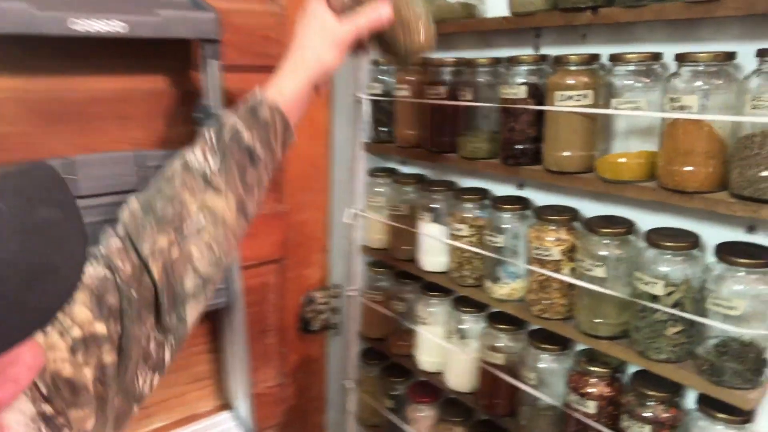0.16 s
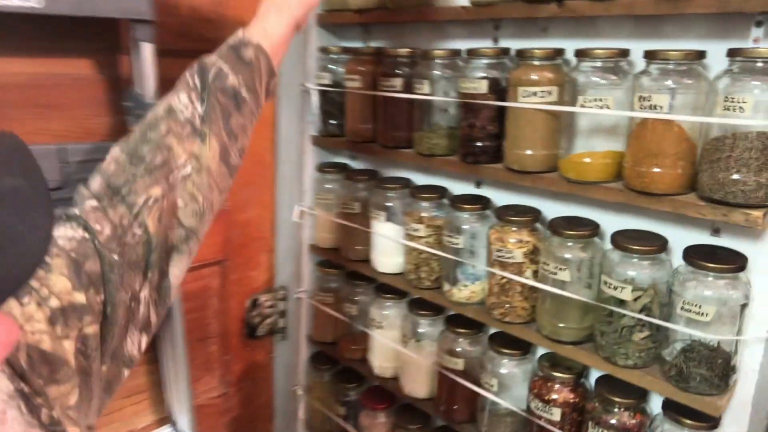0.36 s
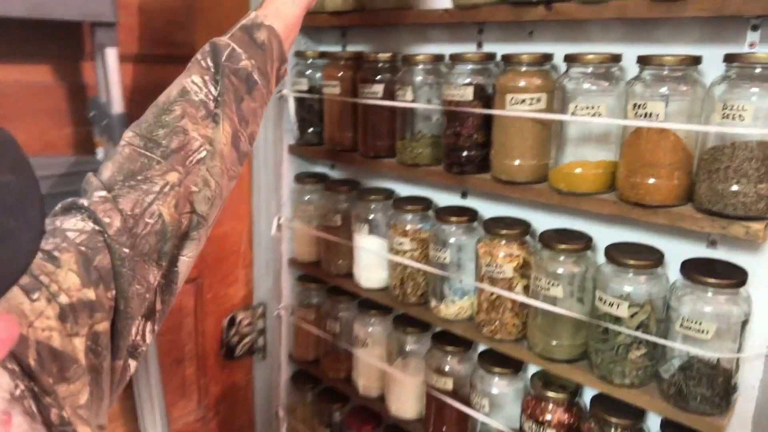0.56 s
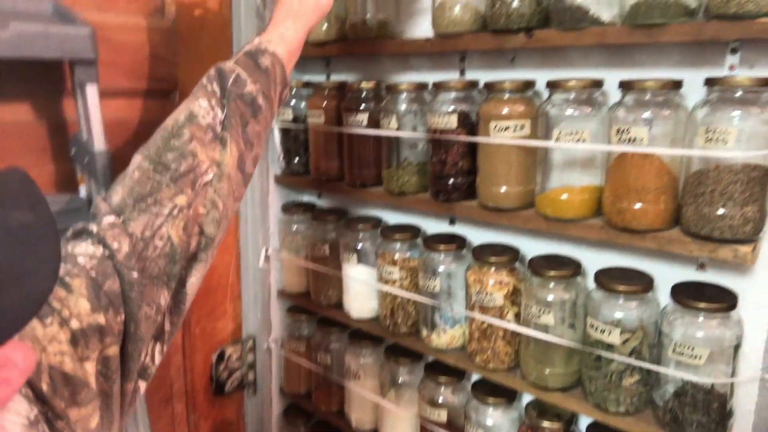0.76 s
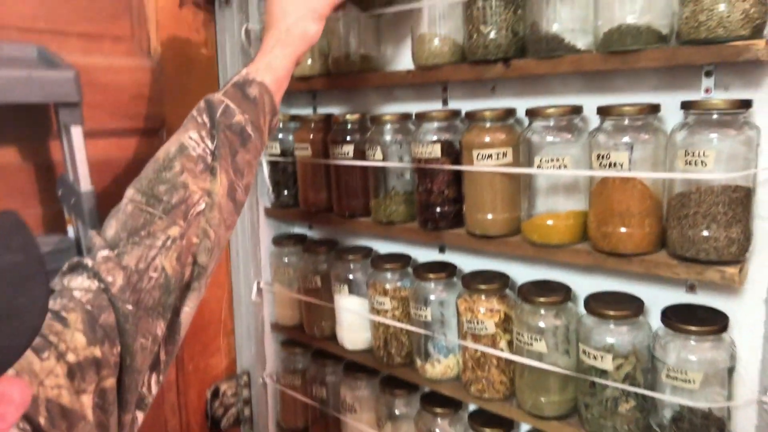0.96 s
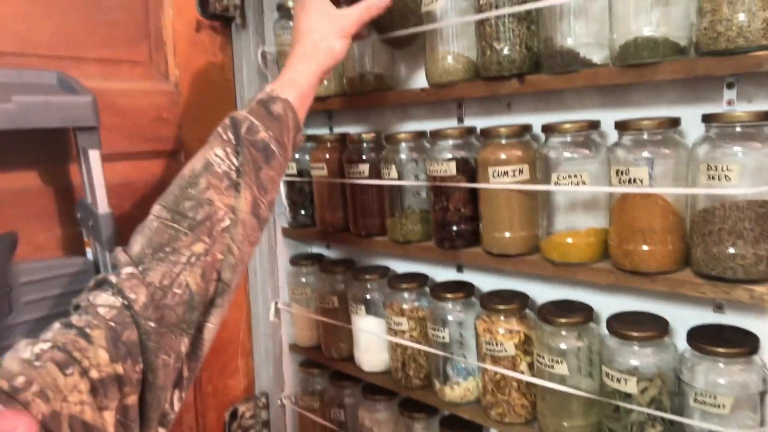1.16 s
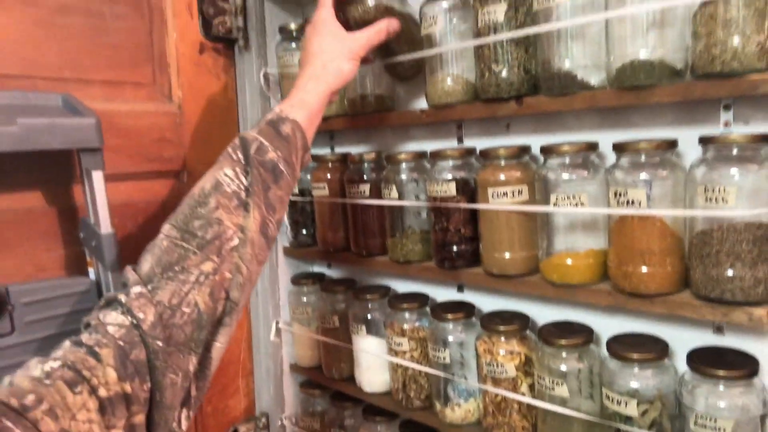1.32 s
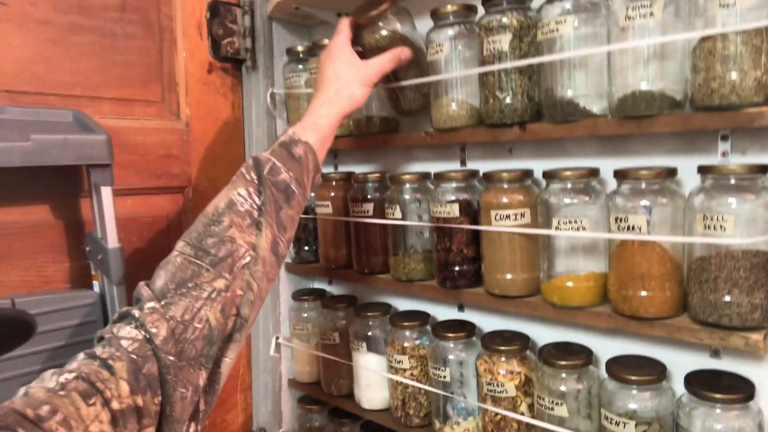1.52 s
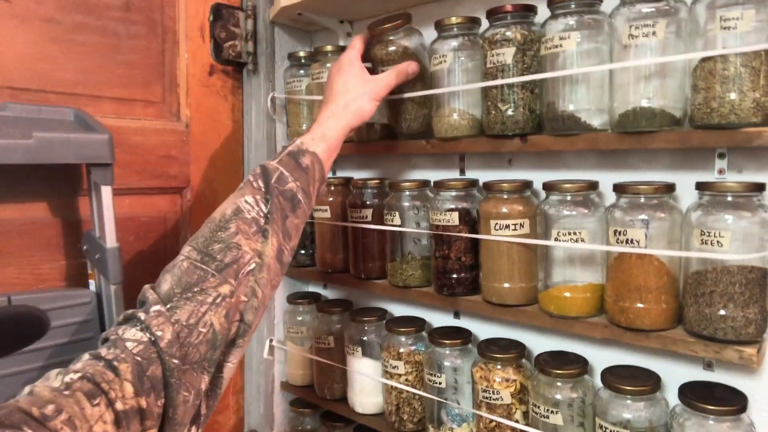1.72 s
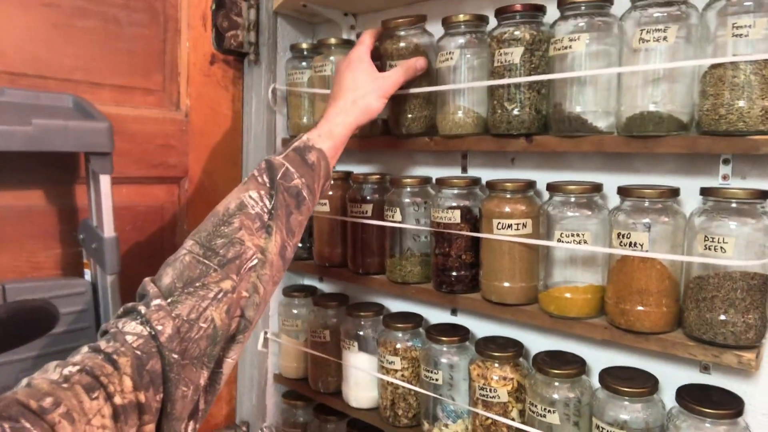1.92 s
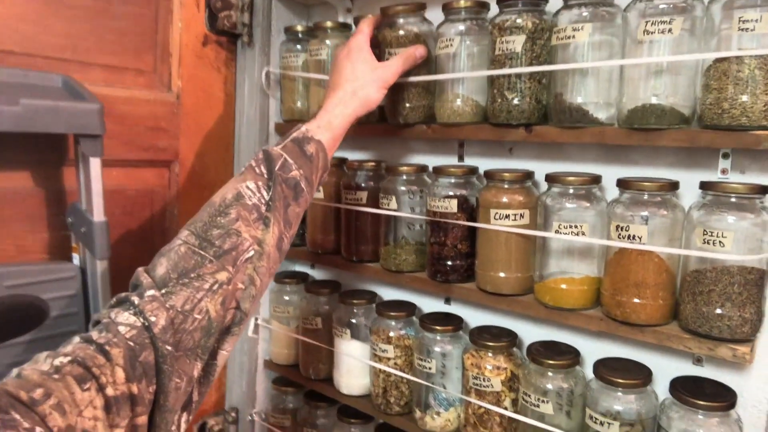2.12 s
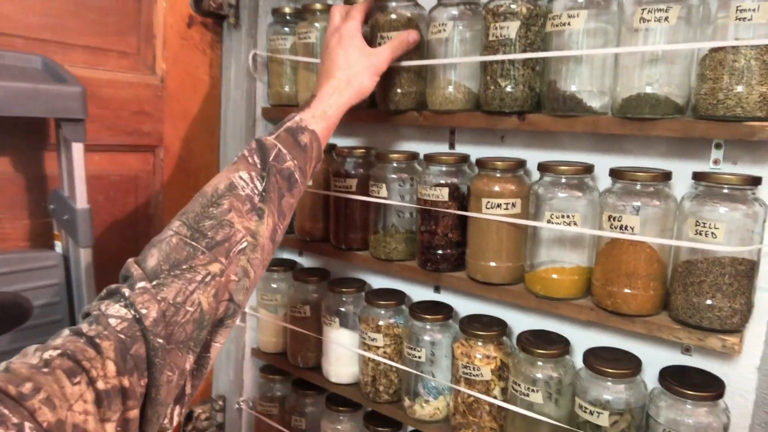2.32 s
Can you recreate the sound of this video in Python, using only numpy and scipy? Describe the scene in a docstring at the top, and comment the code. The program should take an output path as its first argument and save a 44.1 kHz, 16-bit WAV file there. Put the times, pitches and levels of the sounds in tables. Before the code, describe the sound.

Glass jar clinking among jars on a wooden shelf in a small room, heard close. An earlier bang dies away at 0-0.4 s with sleeve rustle, a faint airy swish and dull cord blips. Tiny clinks come near 0.6 s, cord rubs at 0.8-1.1, light clinks at 1.05-1.15 and 1.4, sharp ones at 1.7 and, loudest, 2.0, then small taps to 2.35. Faint hiss and rumble.

```python
"""On a wooden pantry shelf in a small room, a hand-held glass jar clinks against its neighbours.
Each contact sums decaying sine modes of the glass with a short noise crack, and the room answers.
The elastic cord across the shelf rubs in dull blips, each a few low sines under a smooth envelope.
Shaped noise gives the dying earlier bang, the sleeve's rustle and swish, the handling rumble and the hiss."""
import sys
import numpy as np
from scipy import signal
from scipy.fft import rfft, irfft, next_fast_len
from scipy.io import wavfile
from scipy.ndimage import uniform_filter1d

SR = 44100
rng = np.random.default_rng(int(sys.argv[2]) if len(sys.argv) > 2 else 0)


def log_audio(samples):
    """Write samples as a 16-bit WAV file to the path given in sys.argv[1]."""
    # one column per channel
    frames = np.atleast_2d(samples).T
    # limit to full scale, then quantise
    limited = np.clip(frames, -1, 1)
    pcm = np.round(limited * 32767).astype(np.int16)
    wavfile.write(sys.argv[1], SR, pcm)


N = 105002


def amp(db):
    """Logarithmic level: 20 dB is a factor of ten in amplitude."""
    return 10 ** (np.asarray(db) / 20)


def unit(x):
    """Normalization by root mean square: x is scaled to rms 1."""
    return x / np.sqrt(np.mean(x ** 2) + 1e-20)


def along(points, hz):
    """Log-frequency interpolation of (f/Hz, value) points."""
    f, v = np.transpose(points)
    return np.interp(np.log(hz + 1), np.log(f + 1), v)


def curve(rows):
    """Linear interpolation in time of (t/s, value) rows, one value per sample."""
    return np.interp(np.arange(N) / SR, *np.transpose(rows))


def filtered(x, response):
    """Linear filtering: the spectrum of x times a response of frequency."""
    padded = next_fast_len(N + 8192)
    spectrum = rfft(x, padded) * response(np.fft.rfftfreq(padded, 1 / SR))
    return irfft(spectrum, padded)[..., :N]


def rush(spectrum, patchy_db):
    """Random noise of rms 1: time-frequency patches of random gain, then a spectral envelope."""
    z = signal.stft(rng.standard_normal(N), nperseg=512)[2]
    field = uniform_filter1d(rng.standard_normal(z.shape), size=5, axis=0)  # smooth over frequency
    field = uniform_filter1d(field, size=6, axis=1)  # smooth over time
    x = signal.istft(z * amp(patchy_db * unit(field)), nperseg=512)[1][:N]
    return unit(filtered(x, lambda hz: amp(along(spectrum, hz))))


def in_room(x, wet_db):
    """Diffuse reverberation: convolution with a direct pulse and a newly drawn decaying noise tail."""
    # reverberation time of the room: f/Hz, t60/s
    room_t60 = [(200, 0.44), (1000, 0.31), (3000, 0.31), (6000, 0.25), (12000, 0.24)]
    wall_s = 0.006  # delay of the tail behind the direct sound
    hz, t, z = signal.stft(rng.standard_normal(SR // 2), SR, nperseg=256)
    decay = amp(-60 * t / along(room_t60, hz)[:, None])
    tail = signal.istft(z * decay, SR, nperseg=256)[1]
    tail = amp(wet_db) * tail / np.linalg.norm(tail)
    response = np.pad(tail, (round(wall_s * SR), 0))
    response[0] = 1  # direct sound
    return signal.fftconvolve(x, response)


def add(track, x, s):
    """Superposition: x is added to the track from s seconds on."""
    part = track[round(s * SR):][:len(x)]
    part += x[:len(part)]


def clinks():
    """Modal superposition: each contact rings the glass modes in its own proportions, with a crack."""
    # contacts between jars: t/s, crack level/dB, attack/ms, multiplier of the modes' t60,
    # then the mode level/dB at each region
    contacts = [(0.566, -55, 1.04, 1.4, -67, -60, -89, -89, -80, -77, -77, -85, -82, -74, -79, -84, -82, -78, -82, -93, -81, -76),
                (0.647, -42, 1.04, 1.34, -53.5, -71, -50, -54, -69, -69, -62, -74, -75, -72, -74, -87, -88, -86, -86, -91, -88, -84),
                (0.657, -50, 1.03, 1.03, -63, -72, -63, -55, -57, -62, -60, -67, -75, -78, -75, -86, -87, -85, -87, -91, -90, -80),
                (1.041, -30, 1.05, 1.05, -48, -35, -52, -48, -47.5, -57, -54, -49.5, -47.5, -48, -57, -68, -68, -66, -64, -68, -71, -64),
                (1.129, -29.5, 0.88, 1.45, -68.5, -45, -49.5, -57, -55.5, -57, -62, -58, -56, -53, -83, -78, -73, -77, -78, -80, -81, -78),
                (1.155, -35, 1.22, 1.1, -69, -45, -45, -47, -49, -58, -64, -53, -50.5, -49, -64, -76, -72, -73, -76, -78, -77, -74),
                (1.266, -57, 1.1, 1.3, -65, -83, -75, -79, -87, -73, -79, -73, -73, -62, -79, -83, -82, -83, -80, -85, -75, -76),
                (1.424, -24.5, 1.24, 0.91, -63, -39.5, -41.5, -58, -39, -36, -48, -46, -43, -33, -48, -54, -55, -45, -52, -62, -53, -59),
                (1.428, -38, 1.116, 1.16, -52, -40.5, -42.5, -45, -47, -46, -50, -38.5, -43, -38, -62, -71, -61, -59, -68, -67, -63, -74),
                (1.706, -19, 0.94, 0.82, -41, -34, -29.5, -50, -28.5, -26, -58, -30.5, -33.5, -18.5, -38.5, -50, -45, -48, -42.5, -47, -53, -47.5),
                (2.004, -16, 1.22, 1.07, -51, -28, -53, -28, -28.5, -38, -44, -23.5, -32.5, -25.5, -36.5, -50, -44, -44, -45, -48, -52, -49),
                (2.013, -17, 1.1, 1.02, -55.5, -31, -34, -33.5, -48, -24, -43, -36, -57, -40.5, -62, -55, -51, -50, -63, -48, -59, -69),
                (2.092, -39, 1.1, 0.87, -56, -41.5, -37, -36, -52, -57, -54, -36.5, -51, -39, -53, -67, -60, -55, -60, -79, -74, -67),
                (2.277, -45, 1.2, 1.5, -71, -75, -69, -76, -68, -39.5, -62, -69, -74, -72, -84, -85, -86, -82, -85, -91, -89, -80),
                (2.299, -62, 0.71, 0.54, -67, -78, -78, -80, -76, -72, -76, -79, -77.5, -82, -69, -88, -90, -82, -94, -89, -89, -64),
                (2.334, -38, 1, 0.94, -56.5, -63, -72, -62, -66, -64, -77, -70, -72, -80, -79, -78, -79, -83, -79, -90, -89, -86),
                (2.34, -47, 1.36, 0.86, -84, -51, -66, -69, -51, -61, -67, -45.5, -56.5, -60, -74, -79, -72, -74, -82, -89, -89, -85),
                (2.346, -39, 1.43, 0.88, -70, -36.5, -59, -57, -51, -65, -66, -49.5, -78, -74, -77, -82, -79, -80, -88, -90, -89, -85)]
    # centres of those spectral regions: f/Hz
    regions_hz = [420, 900, 1150, 1410, 1600, 1950, 2600, 3080, 3350, 4050, 5200, 6640, 7000, 7350, 8650,
                  10260, 10880, 12000]
    # modes of the jars on their shelf: f/Hz, level/dB relative to the region level,
    # t60/s before the contact's multiplier
    glass = [(415.5, 1, 0.091), (565, 0, 0.066), (775, 0, 0.025), (868, 0.5, 0.036), (942, 4, 0.036),
             (1081, 7.5, 0.02), (1159, 3, 0.036), (1259, 2, .03), (1429, 1, 0.054), (1482, -4, 0.052),
             (1589, 8, 0.021), (1650, 3, 0.018), (1883, 0, 0.021), (2500, -3, 0.028), (2795, -5, 0.088),
             (3101, -1, 0.062), (3147, -1, 0.055), (3335, 3, 0.042), (3418, 2.5, 0.02), (3860, -12, 0.062),
             (3993, -2.5, 0.047), (4047, -1.5, 0.068), (4430, -15.5, 0.052), (5350, -2.5, 0.037),
             (6740, 7.3, 0.035), (6960, 3, 0.07), (7340, 4, .06), (7150, -5, 0.04), (8620, -6, .05),
             (8780, -5, 0.045), (10250, 0.5, 0.031), (10930, 0.5, .05), (11940, 0.5, 0.044),
             (12600, -7, .05)]
    lead_attacks = 0.7  # start ahead of the listed time, in attack times
    scatter_db, crack_t60_s, room_db = 3, 0.041, -8

    out, t = np.zeros(N), np.arange(SR // 3) / SR
    hz, mode_db, t60_s = np.transpose(glass)[..., None]
    grid = np.fft.rfftfreq(len(t), 1 / SR)
    low_cut = grid ** 4 / (grid ** 4 + 300 ** 4)
    for s, crack_db, attack_ms, length, *levels in contacts:
        colour = list(zip(regions_hz, levels))
        level_db = mode_db + along(colour, hz) + scatter_db * rng.standard_normal(hz.shape)
        envelopes = amp(level_db - 60 * t / (t60_s * length))
        ring = (envelopes * np.sin(2 * np.pi * hz * t)).sum(axis=0)

        # the crack has the colour of the same contact
        tint = amp(along(colour, grid) - max(levels)) * low_cut
        noise = irfft(rfft(rng.standard_normal(len(t))) * tint, len(t))
        crack = amp(crack_db - 60 * t / crack_t60_s) * noise

        attack_s = attack_ms / 1000
        contact = (ring + crack) * (1 - np.exp(-t / attack_s))
        add(out, in_room(contact, room_db), s - lead_attacks * attack_s)
    return out


def cord():
    """Slip excitation of damped modes: each rub of the cord is a soft low blip."""
    # slips of the cord: t/s, level/dB, spectral lean/(dB per octave) about its second mode
    rubs = [(0.022, -45, -6), (0.047, -51, -10), (0.086, -58, -10), (0.129, -45, -22), (0.157, -43, 0.1),
            (0.174, -38.5, -7), (0.198, -46.5, 3), (0.293, -55, 3), (0.338, -53.5, -5), (0.364, -57.5, -3),
            (0.649, -63, -9), (0.689, -77, -3), (0.757, -75, -4), (0.798, -44, 4.5), (0.827, -42.5, 2),
            (0.848, -48, 7.5), (0.866, -59, -11), (0.894, -53, -12), (0.905, -45.5, -4), (0.924, -47.5, -6),
            (0.94, -43, 5), (0.967, -44.5, 2), (0.991, -51, 3), (1.039, -45.5, 6), (1.059, -65, -16),
            (1.089, -52, -11), (1.377, -50.5, 8), (1.444, -52.5, 7.5), (1.499, -53.5, -1)]
    # modes of the cord: f/Hz, level/dB relative to the slip level
    cord_modes = [(260, -14), (370, -5), (560, -3.5)]
    rise_s, t60_s, room_db = 0.01, 0.027, -11.5
    lead_s = 0.00606  # start ahead of the listed time

    out, t = np.zeros(N), np.arange(SR // 10) / SR
    hz, mode_db = np.transpose(cord_modes)[..., None]
    rise = np.sin(np.pi / 2 * np.clip(t / rise_s, 0, 1)) ** 2
    decay = amp(-60 * np.maximum(t - rise_s, 0) / t60_s)
    for s, db, lean_db in rubs:
        level_db = db + mode_db + lean_db * np.log2(hz / hz[1])
        phase = 2 * np.pi * (hz * t + rng.random(hz.shape))
        blip = (amp(level_db) * np.sin(phase)).sum(axis=0)
        add(out, in_room(rise * decay * blip, room_db), s - lead_s)
    return out


def fading_bang():
    """Exponential decay of a diffuse field: the earlier bang is coloured noise dying away."""
    # relative spectrum of the bang: f/Hz, level/dB
    bang_spectrum = [(35, -47), (60, -23), (175, -8.5), (236, -10.5), (278, -0.5), (327, -12), (385, 0.5),
                     (810, -18.5), (1100, -12.5), (1700, -12.5), (5580, -16), (15500, -33)]
    start_db, t60_s = -39.5, 0.37
    t = np.arange(N) / SR
    return amp(start_db - 60 * t / t60_s) * rush(bang_spectrum, patchy_db=1.1)


def sleeve_rustle():
    """Friction noise with resonant peaks: patchy noise through Lorentzian bumps, under a level curve."""
    # rms level of the rustle: t/s, level/dB
    rustle_level = [(0.0, -56), (0.15, -56.5), (0.29, -63.5), (0.4, -75.5), (0.68, -69), (0.82, -63),
                    (1.05, -67), (1.25, -74), (1.76, -82), (2.11, -81), (2.22, -79), (2.38, -97)]
    # relative spectrum before the peaks: f/Hz, level/dB per Hz
    rustle_spectrum = [(59, -56), (100, -19.5), (266, -8), (555, -12), (695, -19), (1370, -14.5),
                       (1820, -16), (2450, -17.5), (9000, -43), (11700, -74), (19800, -120)]
    # spectral peaks: f/Hz, half-width/Hz, height/dB
    peaks = [(1050, 120, 6), (1310, 270, 2), (1597, 90, 0), (1790, 30, 2.5), (2970, 74, 2)]

    def bumps(hz):
        """Lorentzian line shape: the peaks add up in dB."""
        return amp(sum(db / (1 + ((hz - centre) / width) ** 2) for centre, width, db in peaks))

    noise = unit(filtered(rush(rustle_spectrum, patchy_db=4.5), bumps))
    return amp(curve(rustle_level)) * noise


def sleeve_swish():
    """Amplitude modulation: one airy swish of noise swells and fades under a Gaussian envelope."""
    # relative spectrum of the swish: f/Hz, level/dB per Hz
    swish_spectrum = [(1470, -39), (2500, -27), (3000, 2), (3370, -5), (4400, 0), (12900, -7), (15500, -16)]
    peak_db, centre_s, spread_s = -66, 0.21, 0.13
    t = np.arange(N) / SR
    envelope = amp(peak_db) * np.exp(-((t - centre_s) / spread_s) ** 2)
    return envelope * rush(swish_spectrum, patchy_db=4.0)


def handling_rumble():
    """Amplitude-modulated low-frequency noise: the rumble of handling follows a level curve."""
    # rms level of the rumble: t/s, level/dB
    rumble_level = [(0.0, -64), (0.11, -76), (0.14, -51.5), (0.16, -64), (0.48, -79), (0.96, -69.5),
                    (1.02, -73), (1.06, -59.5), (1.25, -75.5), (1.78, -71.5), (1.96, -77.5), (2.1, -55),
                    (2.21, -70.5), (2.38, -67.5)]
    # relative spectrum of the rumble: f/Hz, level/dB per Hz
    rumble_spectrum = [(30, -20), (60, -7), (100, 1), (140, -3.2), (250, -3.5), (400, -33), (800, -120)]
    return amp(curve(rumble_level)) * rush(rumble_spectrum, patchy_db=2.5)


def room_hiss():
    """Broadband noise floor: coloured noise with no level curve over time."""
    # relative spectrum of the hiss: f/Hz, level/dB per Hz
    hiss_spectrum = [(24, -36), (40, -3), (179, -18.5), (248, -4), (389, -6.5), (625, -11), (763, -13),
                     (823, -7.5), (887, -22.5), (1920, -15), (15700, -30)]
    return amp(-70.5) * rush(hiss_spectrum, patchy_db=0.75)


def scene():
    """Superposition of all sources at one microphone."""
    cloth = sleeve_rustle() + sleeve_swish()
    background = fading_bang() + cloth + handling_rumble() + room_hiss()
    return (clinks() + cord() + background)[None]


def record(dry):
    """Band limitation: the microphone rolls off the deepest bass and keeps nothing above its top."""
    top_hz, bass_hz = 15810, 40
    return filtered(dry, lambda hz: (hz < top_hz) * hz ** 2 / (hz ** 2 + bass_hz ** 2))


dry = scene()
out = record(dry)
log_audio(out)
```